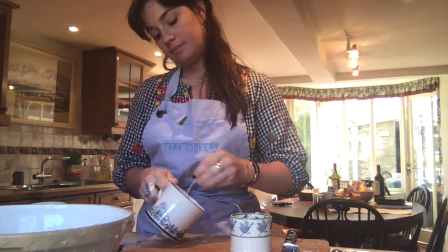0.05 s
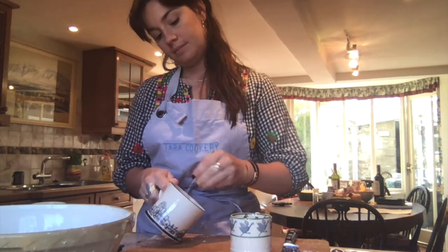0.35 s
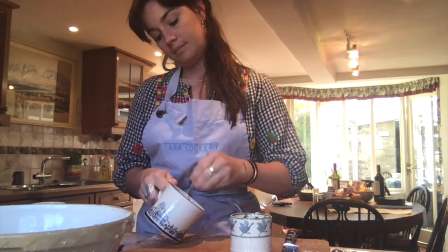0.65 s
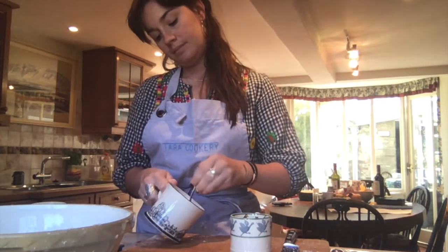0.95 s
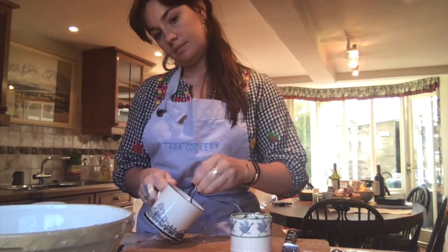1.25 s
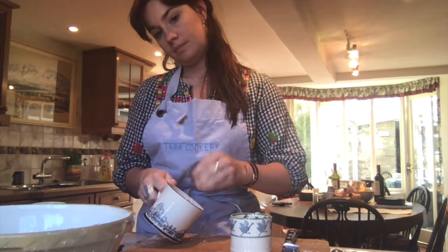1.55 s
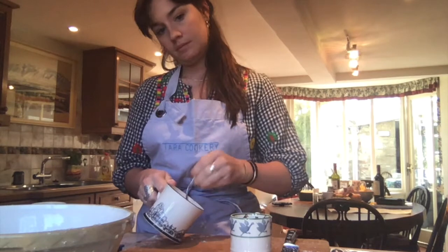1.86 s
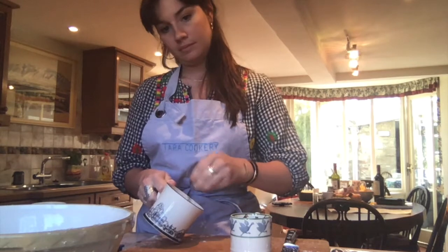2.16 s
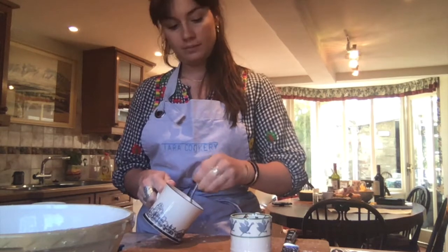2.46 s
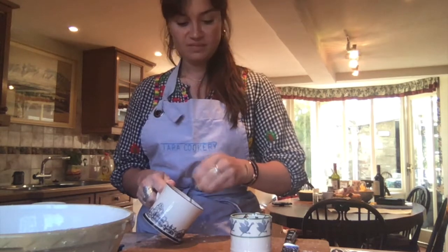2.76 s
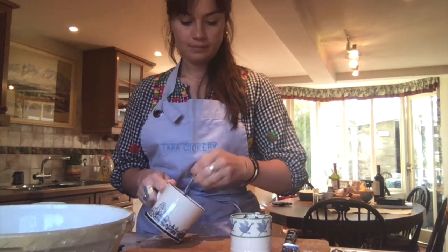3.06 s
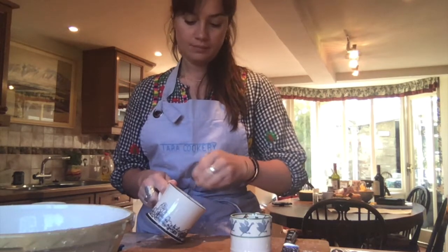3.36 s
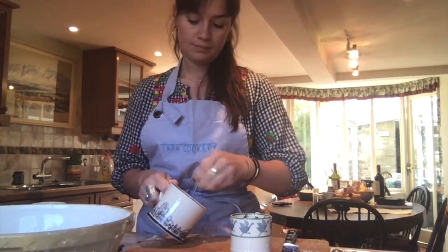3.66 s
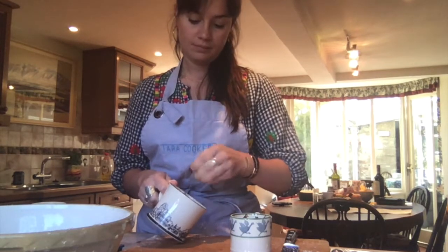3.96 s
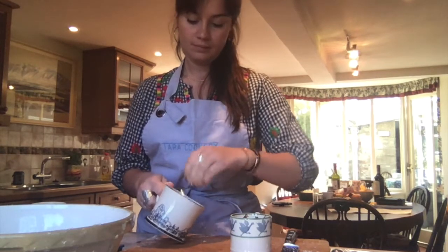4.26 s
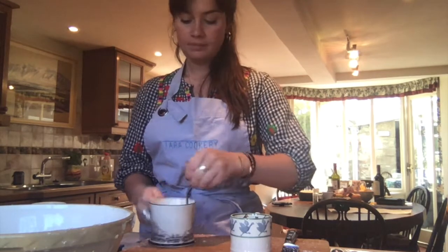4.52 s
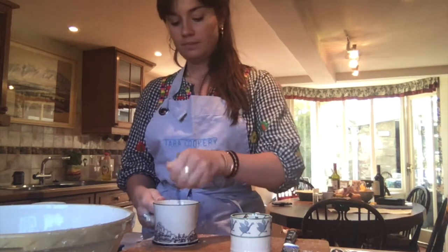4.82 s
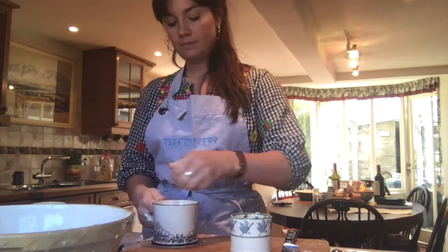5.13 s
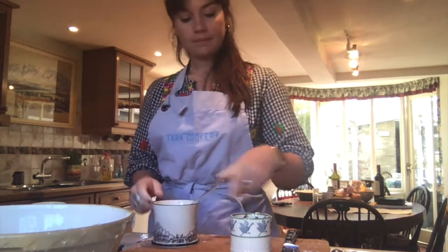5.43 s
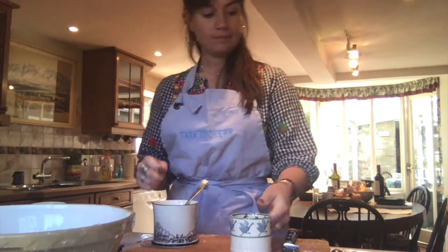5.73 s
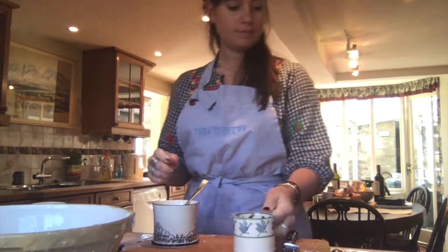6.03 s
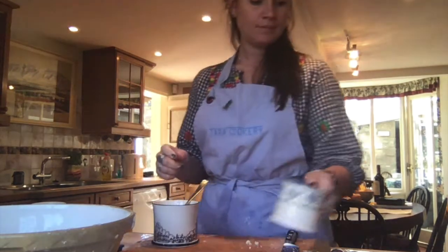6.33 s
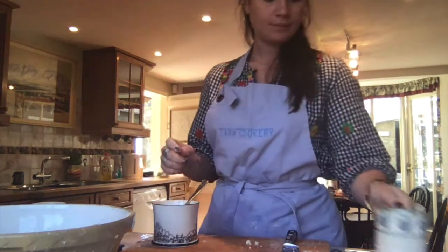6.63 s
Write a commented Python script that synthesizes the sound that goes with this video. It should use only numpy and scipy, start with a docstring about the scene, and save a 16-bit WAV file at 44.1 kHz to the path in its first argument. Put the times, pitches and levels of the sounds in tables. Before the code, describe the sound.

From the start, a metal fork beats egg and water in a china mug, close to the microphone, at about six strokes a second. Each stroke has a light tick on the wall and a wet, hollow knock on the bottom, with small splashes and occasional gurgles. The splashing grows stronger from about 2.7 seconds, and the beating ends around 4.2 seconds. Between 4.3 and 4.7 seconds the mug knocks and rocks onto a wooden counter. The fork stirs round with three bright clinks and faint squelches from 4.8 to 5.1 seconds, then is let go at about 5.3 seconds with a ringing clink and a short rattle. After a pause, a jar is put down at about 6.9 seconds with a thud and a brief ring. A steady low appliance hum lies behind everything, and the kitchen adds a little reverberation.

```python
"""A kitchen with a low appliance hum, one microphone close to the wooden counter.
A fork beats egg and water in a tilted china mug, about six strokes a second. In each stroke the tines
tick on the wall, slide through the egg and knock on the bottom, and the egg splashes back.
The mug is stood on the counter, the fork clinks round it and is let go with a rattle; a jar is put down."""
import sys
import numpy as np
from scipy import signal
from scipy.fft import rfft, irfft
from scipy.io import wavfile

SR = 44100
rng = np.random.default_rng(int(sys.argv[2]) if len(sys.argv) > 2 else 0)


def wav_out(sig):
    """Save sig, one row per channel (or a flat mono array), as 16-bit PCM at SR to the path in sys.argv[1]."""
    wavfile.write(sys.argv[1], SR, np.round(np.clip(np.atleast_2d(sig).T, -1, 1) * 32767).astype(np.int16))


N = 303667
RING = np.arange(SR // 4) / SR  # time axis of one contact, in seconds

# Room tone. Each row: frequency in Hz, relative level in dB.
ROOM_TONE = [(20, -43.5), (33, -23), (48, -1.5), (82, 3.5), (110, -9.5), (200, -10.5), (280, -13.5),
             (370, -22.5), (560, -23), (950, -26), (1400, -38), (2500, -49), (7000, -60.5), (16000, -72)]
# The appliance's hum. Each row: centre in Hz, width in Hz, level in dB.
HUM_BANDS = [(69.1, 16, -46.5), (161, 15, -54)]
# The kitchen's reverberation. Each row: frequency in Hz, t60 in seconds.
ROOM_DECAY = [(150, 0.73), (1000, 0.39), (4000, 0.4), (9000, 0.31), (15000, 0.21)]

# Colours of the contacts. Each row: frequency in Hz, relative level in dB.
WOOD_COLOUR = [(70, -27.5), (175, 9.5), (300, -6), (520, 1), (900, -4), (1250, -7.5), (1900, -15),
               (5000, -27.5), (15000, -39.5)]  # mug on counter
JAR_COLOUR = [(80, -2), (280, -0.5), (700, -3.5), (1100, 2.5), (1800, -2.5), (3100, -3), (4500, -11),
              (7000, -22), (8400, -21), (10000, -40), (15000, -42)]  # jar on counter
CRACK_COLOUR = [(100, -10), (500, 5.5), (1200, -2.5), (1900, 4.5), (4800, 2.5), (6400, -8), (8000, -3.5),
                (11500, -16), (13200, -17.5), (14600, -4), (16000, -13.5)]  # fork on bare china
DROP_COLOUR = [(200, -20), (600, -8), (1000, 5), (1800, -1), (3500, -0.5), (6000, -3.5), (8600, -13),
               (11500, -23), (13200, -30.5), (14800, -24.5), (16000, -23)]  # drops of egg
SCRATCH_COLOUR = [(200, -1), (1000, -3.5), (2000, -2), (3900, -4.5), (4600, -2), (6400, -14), (8500, 1),
                  (12300, -1), (14000, 0.5), (15500, -10), (16500, -26)]  # tines along the wall
SLAP_COLOUR = [(60, -25.5), (170, 1), (360, -11), (520, 2.5), (1050, 4), (1500, -13.5), (2200, -7),
               (3600, -11), (6300, -12.5), (8600, -8), (11000, -19), (13200, -27.5), (14800, -19.5),
               (16000, -27)]  # fork into egg

# The mug's wall. Each row: frequency in Hz, relative level in dB.
WALL_MODES = [(1375, -2.5), (1660, -2.5), (1850, -16), (2470, -14), (2980, -17), (3130, -16), (3495, 1),
              (4480, -5), (4555, 0), (5250, -14), (5335, -9), (6050, -19), (7240, -5), (7615, -8),
              (7770, -13), (8300, -17), (8555, -5), (8870, -13), (9880, -14), (10815, -9), (11300, -17),
              (11730, -17), (12550, -20), (14130, -18), (14450, -16), (15250, -18)]
# Other ringing bodies. Each row: frequency in Hz, relative level in dB, t60 in seconds.
JAR_RING_MODES = [(281, -1.5, .15), (500, -4.5, 0.11), (924, 1.5, 0.11), (1036, -5, 0.11),
                  (1286, -2, 0.087), (2360, -4, .1), (3170, -6, 0.088)]
TINE_MODES = [(1670, -10, 0.21), (1880, -11.5, .07), (2570, -13, 0.044), (3520, -11.5, 0.04),
              (4573, 2.5, 0.096), (4740, -2.5, .06), (5890, -8.5, 0.084), (7130, -5.5, 0.072),
              (7630, -3, 0.16), (8540, 5, 0.06), (9690, -3.5, 0.053), (10060, -1, 0.048),
              (10970, -1, 0.076), (11000, -8, 0.045), (12140, -2.5, 0.049), (14700, -6.5, 0.06),
              (15700, -11.5, .05)]
TIP_MODES = [(8630, 9.5, 0.08), (14450, 1, 0.065), (14720, -17, 0.074), (15100, -5, .07)]  # the tines' tips against the bottom
HOLLOW_MODES = [(182, -4.5, 0.092), (250.6, -12, 0.107), (295.3, -12.5, 0.11), (481.5, -8.5, 0.086),
                (523.5, -14, 0.11), (584, -10.5, 0.12), (741.5, -19, 0.11), (894, -2, 0.091),
                (972, -6, 0.14), (1023, -2.5, 0.11), (1244, -4.5, 0.047), (1324, -14, 0.051),
                (1685, -4.5, 0.051), (1882, -0.5, 0.035), (2520, -9.5, 0.078), (3473, -6, 0.078)]  # the egg-filled mug in the hand, with the air in it

# Knocks on the counter: the mug lands and rocks, then the stirring fork bumps its bottom once. Each row: start
# in seconds, level in dB, tilt in dB per octave.
COUNTER_KNOCKS = [(4.352, -30.5, -9.5), (4.409, -31.5, -6.5), (4.4621, -24.5, -1), (4.483, -34, -4),
                  (4.685, -37, -5)]
# The jar meets the counter: start in seconds, relative level in dB.
JAR_LANDING = (6.8738, -22)
# The fork settles against the rim. Each row: start in seconds, relative level in dB.
RIM_RATTLES = [(5.351, -44), (5.415, -31), (5.468, -37)]
# Bare metal on china. Each row: start in seconds, level in dB, ring time factor, tilt in dB per octave,
# lowest mode against the next in dB, ring of the tines in dB.
FORK_CLINKS = [(4.3655, -20.5, 0.16, 5, -20.5, 2), (4.408, -29.5, 0.26, 6.5, -3.5, -2),
               (4.7806, -14, .75, .5, -15.5, -12), (4.9511, -15.5, 0.69, -1.5, -4.5, -12),
               (5.1324, -16, 1, 2.5, 0.5, -16), (5.3428, -17, 2.6, -1.5, 17, -11.5)]
# Air pockets close in the egg. Each row: start in seconds, level in dB, first and last pitch in Hz,
# length in seconds.
AIR_GULPS = [(0.04, -51, 1107, 1020, 0.077), (0.364, -41, 1156, 1035, 0.036),
             (2.748, -50, 1510, 1280, 0.048), (3.088, -36.5, 1260, 1331, 0.034),
             (3.774, -40.5, 1280, 1370, 0.027), (4.252, -32.5, 1267, 1054, 0.064)]
# Short froth squelches of the fork between strokes, and faint ticks of the tines on the wall with no blow after
# them, both sounded as brief froth. Each row: start in seconds, level in dB.
LONE_SQUELCHES = [(2.373, -40.5), (3.739, -40.5), (4.059, -48), (4.159, -52), (4.485, -41.5), (4.629, -39),
                  (4.682, -42)]
# How much egg the fork throws up. Each row: time in seconds, relative splash level in dB.
SPLASH_LEVELS = [(0, -32), (.35, -34), (.7, -43.5), (1.3, -46.5), (2.7, -34), (3.05, -36.5), (3.24, -29.5),
                 (3.72, -26.5), (3.93, -30.5), (4.2, -60)]
# The beating. Each row: time the fork reaches the bottom in seconds, relative level in dB,
# slide down the wall before it in seconds, cushioning by the egg in dB.
FORK_STROKES = [(.002, -22.5, .05, -3.5), (0.1663, -22, 0.055, 0.5), (0.3416, -22, .0544, -1.5),
                (.5139, -22, 0.056, -2.5), (.667, -22, 0.04, 2), (0.8222, -22, 0.039, 12.5),
                (0.9994, -18.5, 0.052, 0.5), (1.177, -20.5, 0.061, -1.5), (1.3445, -18, 0.055, -1.5),
                (1.5189, -16.5, 0.056, 4), (1.6973, -20, .0612, 0), (1.8666, -19.5, .0591, 0.5),
                (2.037, -21.5, 0.051, -2.5), (2.229, -20.5, 0.059, 2.5), (2.396, -23.5, 0.045, 0.5),
                (2.5626, -22.5, 0.034, 1.5), (2.716, -18.5, .0242, 0), (2.905, -26, 0.044, -1),
                (3.082, -26, 0.041, 0.5), (3.2403, -22, 0.027, -1.5), (3.397, -22, 0.022, -1.5),
                (3.5624, -22.5, 0.027, -0.5), (3.7184, -23, 0.0051, 10), (3.923, -16.5, 0.055, -1.5),
                (4.1883, -23.5, 0.0051, -0.5)]


def amp(db):
    """Decibels to gain."""
    return 10 ** (np.asarray(db) / 20)


def unit(x):
    """Scales to rms 1."""
    return x / np.sqrt(np.mean(x ** 2) + 1e-20)


def struck(x):
    """Scales so that the first 10 ms have rms 1."""
    return x / np.sqrt(np.mean(x[:SR // 100] ** 2) + 1e-20)


def read(points, hz):
    """Joins (Hz, value) points on a log-frequency axis."""
    f, value = np.transpose(points)
    return np.interp(np.log(hz + 1), np.log(f), value)


def add(mix, s, sound):
    """Mixes a sound in at s seconds."""
    start = round(s * SR)
    sound = sound[max(-start, 0):]
    part = mix[max(start, 0):][:len(sound)]
    part += sound[:len(part)]


def click(colour, size=4096):
    """The sharpest causal pulse with this spectrum, energy 1."""
    cepstrum = irfft(np.log(amp(read(colour, np.fft.rfftfreq(size, 1 / SR)))))
    cepstrum[1:size // 2] *= 2
    cepstrum[size // 2 + 1:] = 0
    pulse = irfft(np.exp(rfft(cepstrum)))
    return pulse / np.linalg.norm(pulse)


def through(x, response):
    """Convolves, keeping the length."""
    return signal.fftconvolve(x, response)[:len(x)]


def scatter(t60, direct):
    """A contact and the dense reflections that follow it from the mug, counter and cupboards."""
    taps = rng.standard_normal(len(RING)) * (rng.random(len(RING)) < .25) * amp(-60 * RING / t60)
    taps /= np.linalg.norm(taps)
    taps[0] += direct
    return taps


def contact(sound, t60, direct):
    """A struck sound with its close reflections, its first 10 ms at rms 1."""
    return struck(through(scatter(t60, direct), sound))


def ring(modes, length=1, shape_db=0, vary_db=2, detune=.002):
    """Dying modes; each blow lands on another spot and weights them a little differently."""
    hz, db, t60 = np.transpose(modes)
    size, shift, sign = rng.standard_normal((len(hz), 3)).T
    waves = np.sin(2 * np.pi * np.outer(hz * (1 + detune * shift), RING))
    waves *= amp(-60 * RING / np.maximum(t60 * length, .03)[:, None])
    weights = np.sign(sign) * amp(db + shape_db + vary_db * size)
    return struck(weights @ waves)


def wall(length):
    """The mug's modes with ring times scaled by length: the high ones die first."""
    return [(hz, db, length * .14 * (hz / 2000) ** -.22) for hz, db in WALL_MODES]


def grains(per_s, rise, fall, spread_db):
    """A short shower of tiny impulses of very unequal size; rise and fall are in seconds."""
    sizes = amp(spread_db * np.minimum(rng.exponential(1, len(RING)), 4))
    sizes *= rng.choice([-1, 1], len(RING))
    envelope = (1 - np.exp(-RING / rise)) * np.exp(-RING / fall)
    shower = sizes * (rng.random(len(RING)) < per_s / SR) * envelope
    return shower / np.sqrt(np.sum(shower ** 2) / (fall * SR) + 1e-20)


def bubbles(low_hz, high_hz, spread_s, cycles, glide, count):
    """A cluster of small bubbles, each ringing at its own rising pitch."""
    out, t = np.zeros(len(RING)), RING[:SR // 25]
    when, size, loud = rng.random((3, count, 1))
    hz = low_hz * (high_hz / low_hz) ** size
    fade = np.exp(-t * hz / cycles)
    phase = 2 * np.pi * np.cumsum(hz * (1 + glide * (1 - fade)), 1) / SR
    pops = amp(-8 * loud) * (1 - fade ** 4) * fade * np.sin(phase)
    for delay, pop in zip(spread_s * when[:, 0] ** 1.5, pops):
        add(out, delay, pop)
    out = through(out, scatter(t60=.048, direct=.73))
    return out / np.sqrt(np.sum(out ** 2) / (SR // 100))


def background():
    """Steady room tone and an appliance's wavering low hum, behind everything else."""
    hz = np.fft.rfftfreq(N, 1 / SR)
    out = amp(-46.5) * unit(irfft(rfft(rng.standard_normal(N)) * amp(read(ROOM_TONE, hz)), N))
    for centre_hz, width_hz, db in HUM_BANDS:
        resonance = 1 / (1 + (2 * (hz - centre_hz) / width_hz) ** 4)
        out += amp(db) * unit(irfft(rfft(rng.standard_normal(N)) * resonance, N))
    steady_hum = np.sin(2 * np.pi * HUM_BANDS[0][0] * np.arange(N) / SR)
    return out + amp(-41.5) * steady_hum


def kitchen(x):
    """What the room sends back to the microphone: a tail whose treble dies first."""
    hz, t, noise = signal.stft(rng.standard_normal(SR // 2), SR, nperseg=256)
    tail = signal.istft(noise * amp(-60 * t / read(ROOM_DECAY, hz)[:, None]), SR)[1]
    tail *= 1 - np.exp(-np.arange(len(tail)) / SR / .0058)
    return through(x, tail / np.linalg.norm(tail))


def bump_times(stood_s=4.5, half_turn_s=.089):
    """Half a turn after a stirring clink, the fork bumps the standing mug's bottom through the egg."""
    return [s + half_turn_s for s, *_ in FORK_CLINKS[:-1] if s > stood_s]


def bounce_times(first_gap_s=.043, shrink=.85, count=6):
    """The fork, let go at the last clink, comes down again ever sooner."""
    return FORK_CLINKS[-1][0] + np.cumsum(first_gap_s * shrink ** np.arange(count))


def jar():
    """A jar is put down hard on the counter: a thud and a short ring."""
    out = np.zeros(N)
    s, db = JAR_LANDING
    thud = contact(click(JAR_COLOUR), t60=.23, direct=.2)
    add(out, s, amp(db) * (amp(3.5) * thud + amp(.5) * ring(JAR_RING_MODES, vary_db=0)))
    return out


def counter():
    """The mug lands and rocks on the wood, then passes the fork's bumps and its drop on to it."""
    out = np.zeros(N)
    bumps = [(s, -32.5, -4.5) for s in bump_times()]
    drop = [(FORK_CLINKS[-1][0], -27, -3), (bounce_times()[0], -31.5, -3)]
    for s, db, tilt_db in COUNTER_KNOCKS + bumps + drop:
        colour = [(hz, level + tilt_db * np.log2(hz / 500)) for hz, level in WOOD_COLOUR]
        add(out, s, amp(db) * contact(click(colour), t60=.14, direct=.86))
    return out


def rattle():
    """The loose fork chatters on the rim: a shower of tiny contacts into wall and tines."""
    out = np.zeros(N)
    for s, db in RIM_RATTLES:
        china = ring(wall(length=.53), vary_db=4.5, detune=.0086)
        metal = ring(TINE_MODES, length=.63, vary_db=11, detune=.029)
        taps = grains(per_s=420, rise=.0033, fall=.025, spread_db=3.5)
        add(out, s, .4 * amp(db) * unit(through(taps, china + amp(-12) * metal)))
    return out


def clinks():
    """The fork on bare china: a crack, ringing tines, and a wall that rings longer with the hand off."""
    out, crack_pulse = np.zeros(N), click(CRACK_COLOUR)
    octaves = np.log2(np.transpose(WALL_MODES)[0] / 4000)
    bumps = [(s, -41.5, 1.3, 2, -14, -27) for s in bump_times()]
    bounces = [(s, -27 - 2.7 * k, 1.62, -.5, 9.5, -28) for k, s in enumerate(bounce_times())]
    for s, db, length, tilt_db, lowest_db, tines_db in FORK_CLINKS + bumps + bounces:
        shape_db = tilt_db * octaves
        shape_db[:2] += lowest_db * np.array([.5, -.5])  # the handle splits the lowest mode in two
        china = amp(-3) * ring(wall(length), shape_db=shape_db, vary_db=3.5, detune=.00076)
        short_ring = ring(wall(length=.45), shape_db=shape_db, vary_db=7.5, detune=.0058)
        clash = amp(-5.5) * contact(short_ring, t60=.056, direct=.59)
        tine_ring = ring(TINE_MODES, vary_db=-.5, detune=.0085)
        metal = amp(tines_db) * contact(tine_ring, t60=.026, direct=.55)
        hardness = amp(.11 * (db + 15))  # light touches crack less
        crack = amp(-11.5) * hardness * contact(crack_pulse, t60=.09, direct=.11)
        add(out, s, amp(db) * (china + clash + metal + crack))
    return out


def gulps():
    """An air pocket closing in the egg gives a gliding, gurgling tone."""
    out, lowpass = np.zeros(N), signal.butter(2, 90, fs=SR, output="sos")
    for s, db, first_hz, last_hz, length_s in AIR_GULPS:
        progress = np.minimum(RING / length_s, 1)
        hz = last_hz + (first_hz - last_hz) * (1 - progress) ** 2
        flutter = unit(signal.sosfilt(lowpass, rng.standard_normal(len(RING))))
        tone = np.sin(np.pi * progress) * (.6 + .8 * flutter) * np.sin(2 * np.pi * np.cumsum(hz) / SR)
        add(out, s, amp(db) * through(tone, scatter(t60=.1, direct=.92)))
    return out


def squelches(lead_s=.017, loss_db=4.5):
    """Froth squelches between strokes, ahead of clinks and at bumps, less each turn as the egg calms."""
    out = np.zeros(N)
    leading = [(s - lead_s, -41 - k * loss_db) for k, (s, *_) in enumerate(FORK_CLINKS[:-1])]
    bumps = [(s, -37.5 - k * loss_db) for k, s in enumerate(bump_times())]
    for s, db in LONE_SQUELCHES + leading + bumps:
        froth = bubbles(low_hz=2380, high_hz=5900, spread_s=.014, cycles=4.9, glide=.044, count=14)
        fizz = bubbles(low_hz=6000, high_hz=13000, spread_s=.011, cycles=4.1, glide=.16, count=10)
        add(out, s, amp(db) * (froth + amp(-1) * fizz))
    return out


def splashes():
    """The thrown egg falls back after each blow in two showers of drops and bubbles."""
    out, drop_pulse = np.zeros(N), click(DROP_COLOUR)
    for s, *_ in FORK_STROKES:
        thrown_db = np.interp(s, *np.transpose(SPLASH_LEVELS))
        for delay_s, db in [(.02, -5.5), (.046, -13.5)]:
            shower = grains(per_s=1100, rise=.0036, fall=.0074, spread_db=2.5)
            drops = through(through(shower, scatter(t60=.056, direct=.46)), drop_pulse)
            froth = bubbles(low_hz=883, high_hz=4024, spread_s=.02, cycles=9.7, glide=.12, count=8)
            add(out, s + delay_s, amp(thrown_db + db) * (drops + froth))
    return out


def tines(usual_blow_db=-21, usual_slide_s=.05):
    """Before each blow the tines tick on the wall, both ring, and the fork slides through the froth."""
    out, scratch = np.zeros(N), click(SCRATCH_COLOUR)
    for blow_s, blow_db, slide_s, _ in FORK_STROKES:
        s = blow_s - slide_s
        if s <= 0:
            continue
        # louder on a harder stroke or from higher up the wall, softer as the beating goes on
        db = -23 + .27 * (blow_db - usual_blow_db) + 4 * np.log2(slide_s / usual_slide_s) - .6 * blow_s
        tick = amp(-15.5) * contact(scratch, t60=.114, direct=.29)
        metal = amp(-11.5) * contact(ring(TINE_MODES, vary_db=7.5, detune=.009), t60=.025, direct=1.1)
        slide = amp(-21) * through(grains(per_s=880, rise=.025, fall=.014, spread_db=3.5), scratch)
        china = amp(-23.5) * ring(wall(length=.44), vary_db=11, detune=.004)
        add(out, s, amp(db) * (tick + metal + slide + china))
        froth = bubbles(low_hz=3720, high_hz=6500, spread_s=.038, cycles=6.3, glide=.09, count=3)
        add(out, s + .016, amp(db - 25) * froth)
    return out


def beating():
    """Each blow slaps the egg, sounds the mug's hollow and its damped wall, and whips in bubbles."""
    out, slap_pulse, drop_pulse = np.zeros(N), click(SLAP_COLOUR), click(DROP_COLOUR)
    for s, db, _, cushion_db in FORK_STROKES:
        slap = contact(slap_pulse, t60=.071, direct=.36)
        hollow = ring(HOLLOW_MODES, vary_db=0, detune=.015)
        china = contact(ring(wall(length=.38), vary_db=1, detune=.0044), t60=.024, direct=.51)
        froth = bubbles(low_hz=953, high_hz=4840, spread_s=.019, cycles=11, glide=.097, count=7)
        spray = through(grains(per_s=1000, rise=.007, fall=.021, spread_db=2.5), drop_pulse)
        tips = ring(TIP_MODES, vary_db=9.5, detune=.0107)
        blow = amp(-4) * slap + amp(-5) * hollow + amp(-13.5) * china
        blow += amp(-10.5) * froth + amp(-22.5) * spray + amp(-15) * tips
        blow *= 1 - np.exp(-RING / .00074)  # the egg softens the attack
        # a cushioned blow gains bass as it loses treble; the bass thins as the egg turns to froth
        bass_db = 7 + .25 * cushion_db - .64 * s
        cushion = click([(200, bass_db), (700, 0), (1500, 0), (5000, -cushion_db)])
        add(out, s, amp(db - 4.5) * struck(through(blow, cushion)))
        # froth is squeezed out just ahead of the fork
        fizz = bubbles(low_hz=4410, high_hz=14500, spread_s=.009, cycles=6, glide=.059, count=8)
        add(out, s - .011, amp(db - 24.5) * fizz)
    return out


def scene():
    """Mug, fork and jar close to the microphone, with the room and its hum behind them, in mono."""
    near = tines() + beating() + splashes() + squelches() + gulps()
    near += clinks() + rattle() + counter() + jar()
    return (near + amp(-11) * kitchen(near) + background())[None]


def record(dry):
    """The recorder cuts off steeply at 15.9 kHz."""
    lowpass = signal.firwin(255, 15900, window=("kaiser", 8), fs=SR)
    return signal.oaconvolve(dry, lowpass[None], "same", axes=1)


dry = scene()
out = record(dry)
wav_out(out)
```